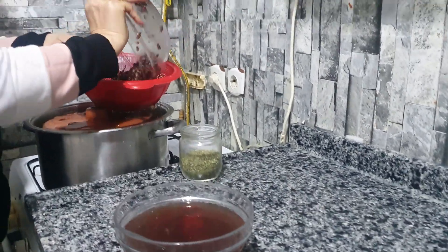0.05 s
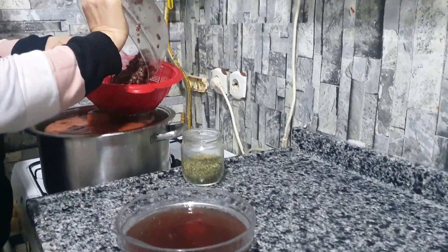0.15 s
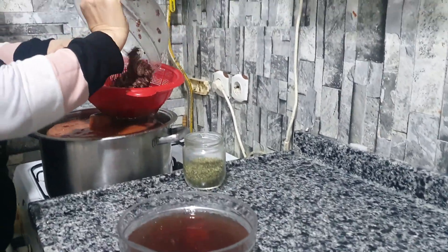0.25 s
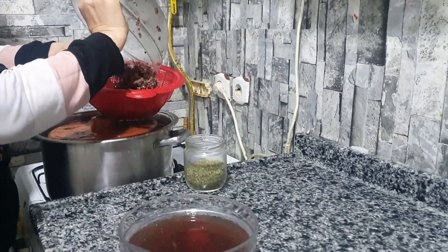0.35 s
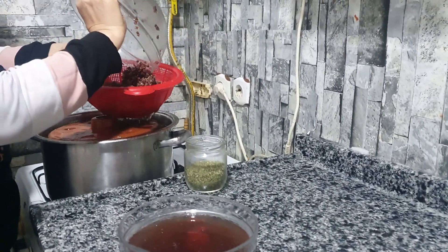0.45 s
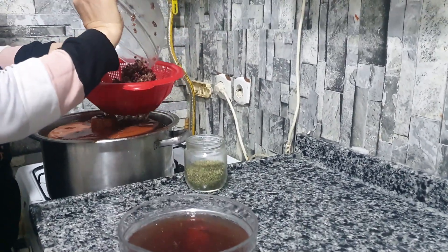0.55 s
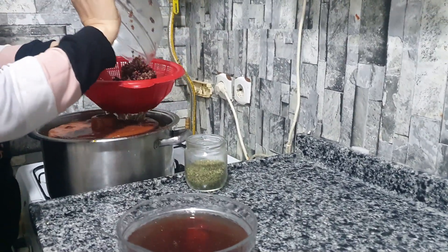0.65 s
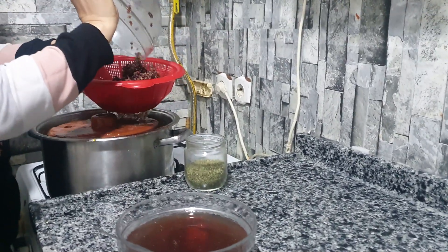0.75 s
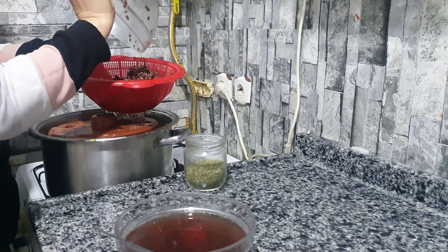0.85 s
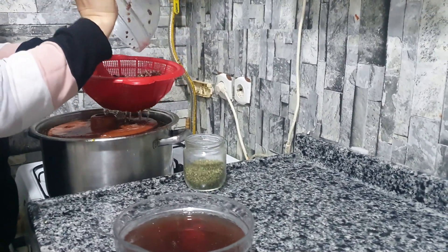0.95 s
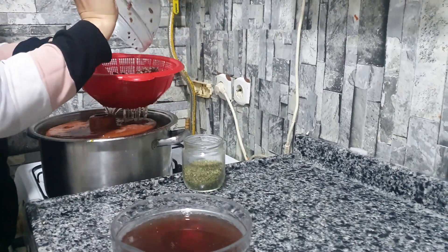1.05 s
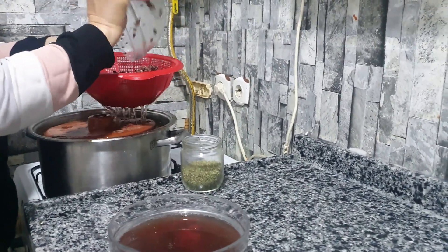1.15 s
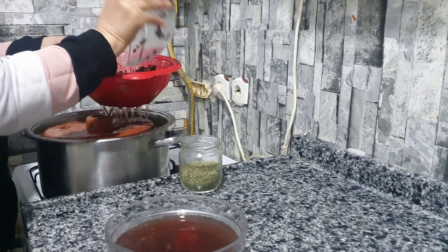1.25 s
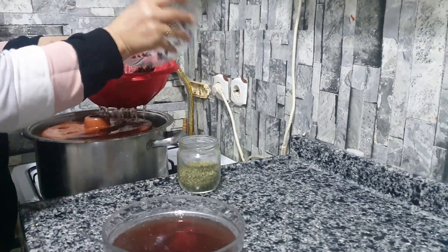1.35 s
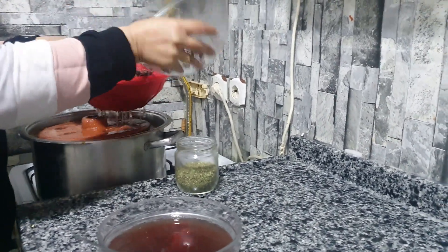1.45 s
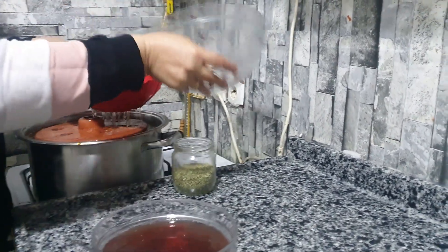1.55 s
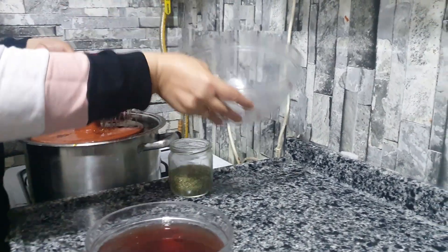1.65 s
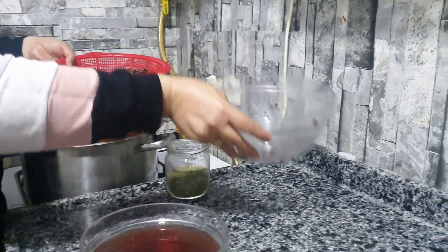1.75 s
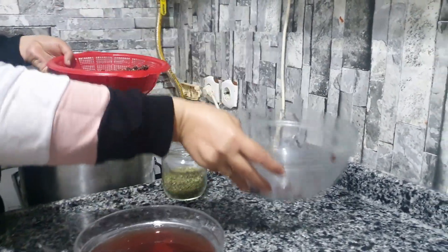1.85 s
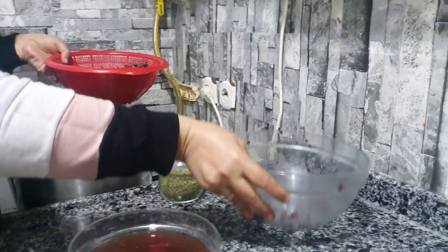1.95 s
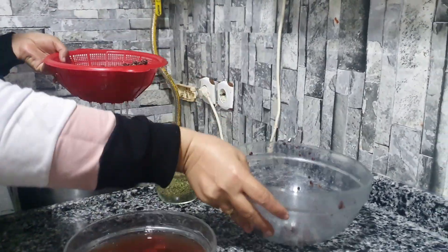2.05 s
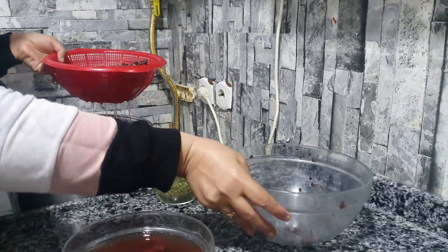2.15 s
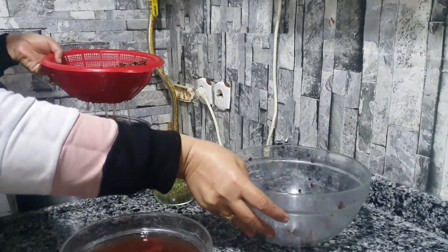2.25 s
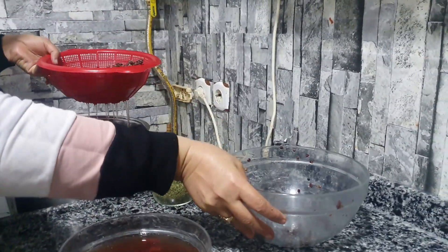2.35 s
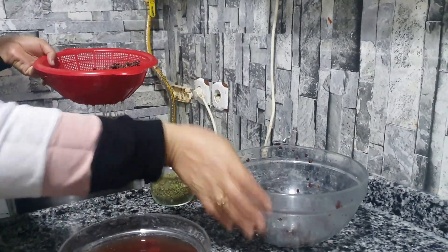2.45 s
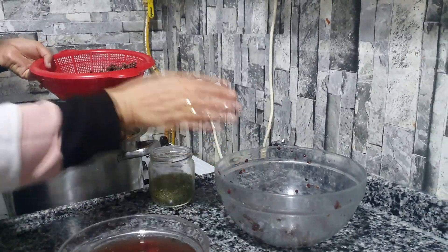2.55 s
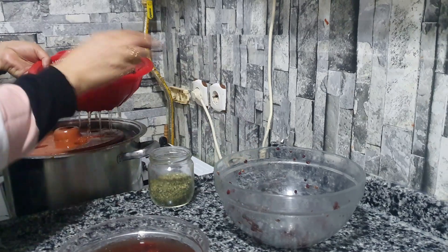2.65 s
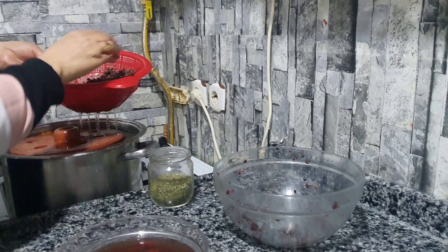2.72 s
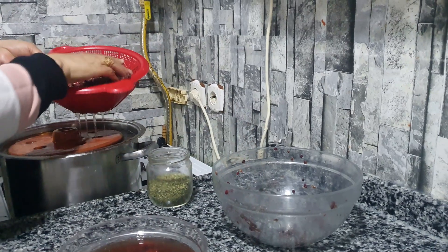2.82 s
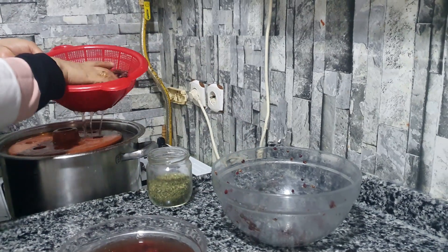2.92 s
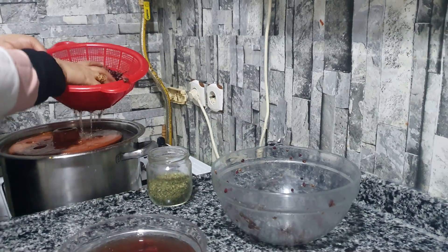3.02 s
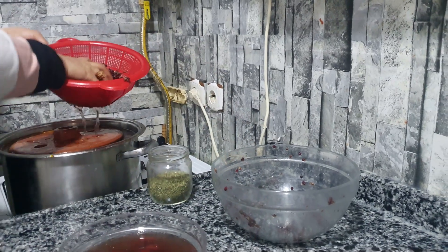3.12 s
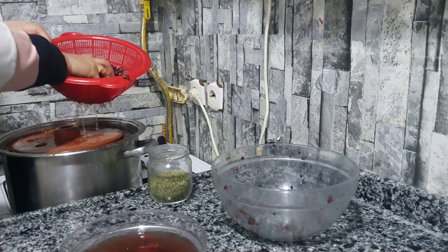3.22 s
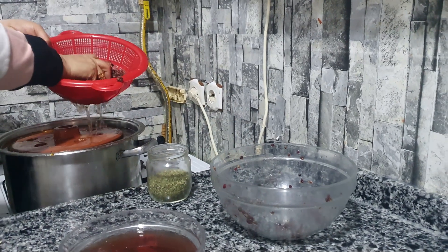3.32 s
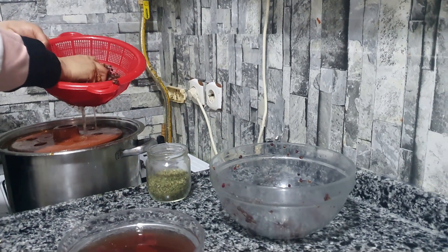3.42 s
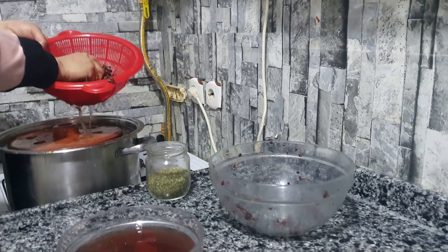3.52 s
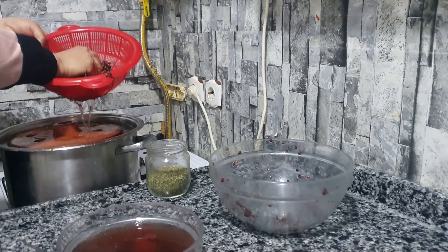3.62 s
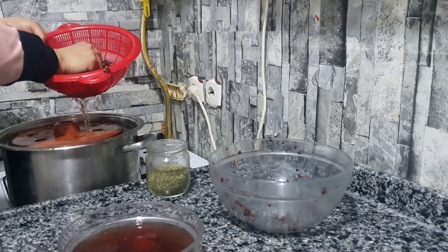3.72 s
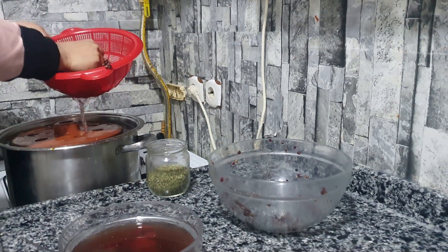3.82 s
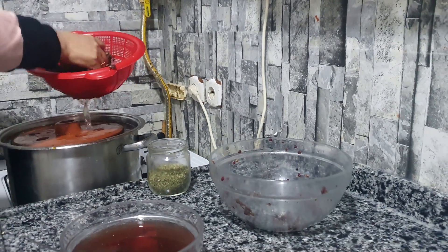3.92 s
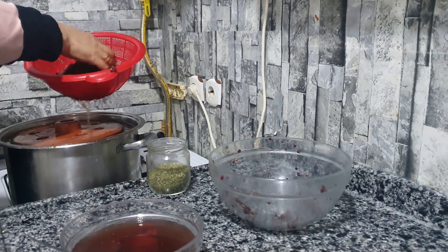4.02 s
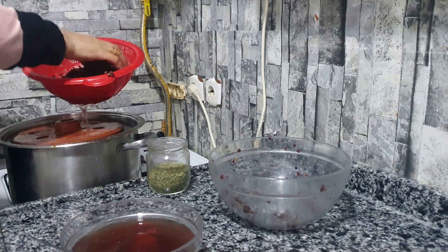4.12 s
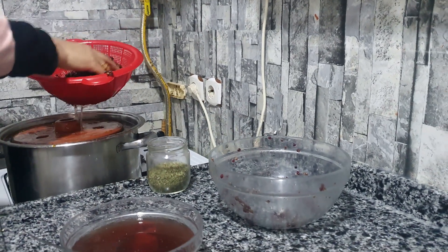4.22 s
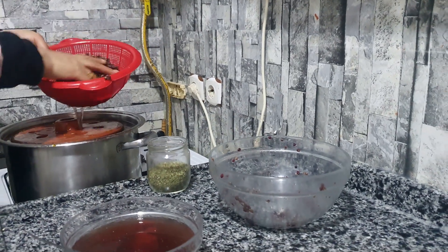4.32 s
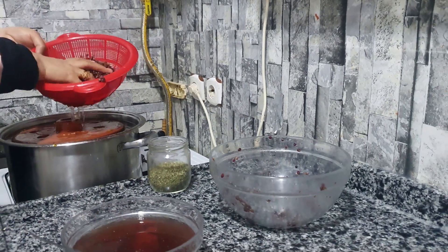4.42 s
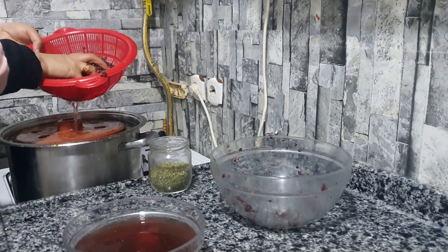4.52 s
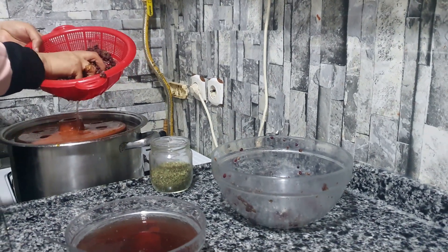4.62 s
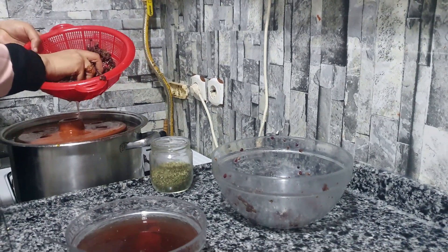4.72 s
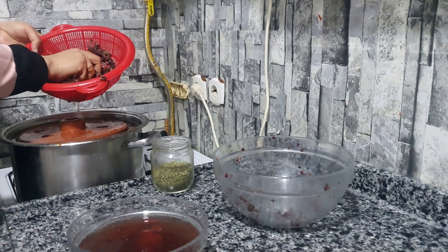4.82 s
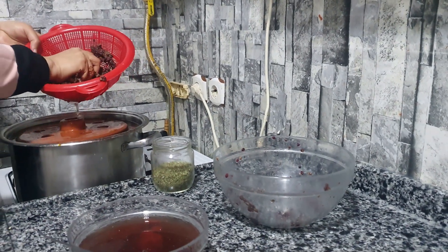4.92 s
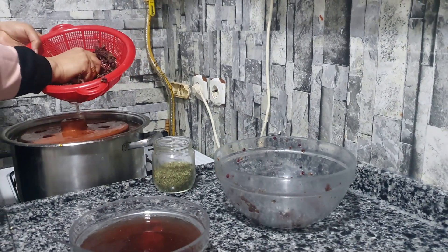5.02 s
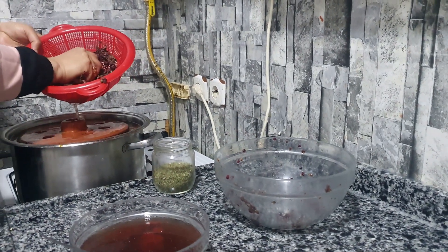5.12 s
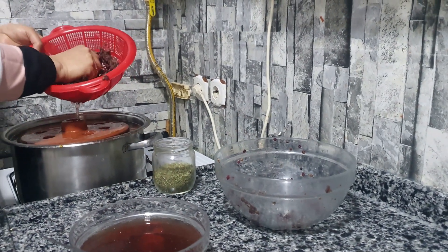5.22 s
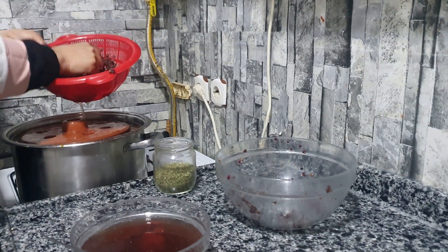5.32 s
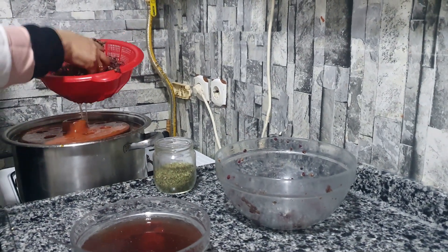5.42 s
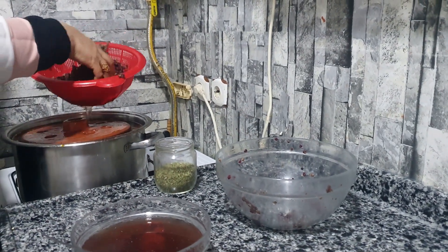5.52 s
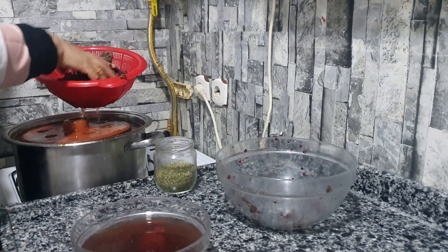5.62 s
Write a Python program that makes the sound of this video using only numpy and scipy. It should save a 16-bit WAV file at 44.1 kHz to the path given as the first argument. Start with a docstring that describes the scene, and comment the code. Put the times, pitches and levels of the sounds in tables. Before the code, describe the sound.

Juice trickles and drips into a pot with wet plops and squelches, interrupted by a loud clatter of a glass bowl set on stone.

```python
"""A fridge hums in a small tiled kitchen. Soaked fruit slides from a glass bowl into a plastic
colander: lumps plop, wet pulp squelches, and juice trickles and drips into a pot, ringing as bubbles.
After two seconds the empty bowl is set down hard on a stone counter, rings and rocks twice.
A limiter turns the volume down at this clatter and lets it creep back,
while a hand squeezes the pulp and sends more juice through."""
import sys
import numpy as np
from scipy import signal
from scipy.fft import rfft, irfft
from scipy.io import wavfile
from scipy.ndimage import uniform_filter1d, minimum_filter1d

SR = 44100
rng = np.random.default_rng(int(sys.argv[2]) if len(sys.argv) > 2 else 0)


def master_out(mix):
    """Clip the mix to full scale and print it as 16-bit PCM to the path in sys.argv[1]."""
    frames = np.transpose(np.atleast_2d(mix))
    ceiling = np.clip(frames, -1, 1)
    pcm = np.round(ceiling * 32767).astype(np.int16)
    wavfile.write(sys.argv[1], SR, pcm)


N = 250047
TIME = np.arange(N) / SR
DRAIN_DB = -62.5  # the thin, steady run of juice

# tone of splashing juice: pitch_hz, level_db
PATTER_TONE = [(250, -8), (500, -12.5), (800, -4), (1000, -1.5), (1500, 4.5), (2100, 4.5), (2600, -1.5),
               (3400, -20.5), (6000, -58.5)]
# tone of fizzing pulp and of a drop's tick: pitch_hz, level_db
FIZZ_TONE = [(1800, -22), (3200, 0.5), (5000, -2), (7600, -0.5), (9200, -12.5), (11500, -7), (15500, -7)]


def amp(db):
    """Turns decibels into a gain to multiply by."""
    return 10 ** (np.asarray(db) / 20)


def evened(x):
    """Scales a sound to an average power of 1."""
    return x / np.sqrt(np.mean(x ** 2) + 1e-20)


def look_up(points, hz):
    """Reads between the rows of a (pitch_hz, value) table, on a musical pitch scale."""
    pitches, values = np.transpose(points)
    return np.interp(np.log(hz + 1), np.log(pitches + 1), values)


def add(mix, start_s, sound):
    """Mixes a stereo sound in at its start time."""
    part = mix[:, round(start_s * SR):][:, :sound.shape[1]]
    part += sound[:, :part.shape[1]]


def panned(x, left_db):
    """Makes a sound stereo, with the left side left_db louder than the right."""
    return x * amp([[left_db / 2], [-left_db / 2]])


def click(tone, tilt_db=0, size=4096):
    """The sharpest click that has a given tone; tilt_db adds treble per octave."""
    hz = abs(np.fft.fftfreq(size, 1 / SR))
    log_gain = np.log(amp(look_up(tone, hz) + tilt_db * np.log2((hz + 100) / 1000)))
    spectrum = np.exp(np.conj(signal.hilbert(log_gain)))  # packs the energy at the start
    pulse = np.fft.ifft(spectrum).real[:size // 2]
    return pulse / np.linalg.norm(pulse)


def convolved(x, response):
    """Every sample of x sets off its own copy of the response."""
    return signal.fftconvolve(np.atleast_2d(x), np.atleast_2d(response), axes=1)[:, :N]


def paired(spectra, hz):
    """Turns two unrelated noises into left and right: alike in the bass, apart in the treble."""
    # how alike the two sides are: pitch_hz, likeness (0 to 1)
    likeness = [(60, 0.88), (150, 0.9), (300, 0.85), (700, 0.36), (2000, 0.05), (8000, 0.03)]
    same = np.clip(look_up(likeness, hz), -1, 1)
    return np.array([spectra[0], same * spectra[0] + np.sqrt(1 - same ** 2) * spectra[1]])


def kitchen(x, wet_db, right_lag_s=.00018, gap_s=.0023, echo_s=.0192, echo_db=-12):
    """The direct sound, plus a far-wall echo and a wash of reflections, both set by wet_db."""
    # time the room takes to fade by 60 dB: pitch_hz, fade_s
    fade_times = [(100, 0.24), (260, 0.51), (700, 0.37), (1840, 0.35), (4850, 0.32), (12000, 0.14)]
    t = TIME[:SR * 3 // 4]
    early_boost = 1 + .97 * np.exp(-t / .0078)
    reflections = rng.choice([-1., 1.], (2, len(t))) * (t > gap_s) * early_boost
    hz, age, bands = signal.stft(reflections, SR, nperseg=256)
    bands = paired(bands, hz[:, None]) * amp(-60 * age / look_up(fade_times, hz)[:, None])
    tail = signal.istft(bands, SR, nperseg=256)[1]
    tail /= np.linalg.norm(tail, axis=1, keepdims=True)
    tail[:, round(echo_s * SR)] += amp(echo_db)
    direct = np.array([x[0], np.roll(x[1], round(right_lag_s * SR))])  # the pot is nearer the left
    return direct + amp(wet_db) * convolved(.75 * x + .25 * x[::-1], tail)


def room_tone(air_db=-54, waver=.36):
    """The soft hiss of still air and the wavering hum of the fridge."""
    # tone of the air: pitch_hz, level_db
    air_tone = [(15, -32.5), (25, -23), (113, 2.5), (178, -10), (368, -8.5), (445, -9), (523, -12.5),
                (762, -14), (1050, -27.5), (1900, -16), (3340, -43), (7500, -26), (9050, -41.5),
                (11200, -30), (15500, -35)]
    # notes in the fridge's hum: pitch_hz, level_db
    hum_notes = [(39.5, -58.5), (84, -64), (140, -61.5), (199.2, -67), (441.4, -63.5)]
    hz = np.fft.rfftfreq(N, 1 / SR)
    noise = paired(rfft(rng.standard_normal((2, N))), hz)
    air = evened(irfft(noise * amp(look_up(air_tone, hz)), N))
    turns_s = np.linspace(0, N / SR, 50)
    hum = 0
    for pitch_hz, db in hum_notes:
        swell, drift = (np.interp(TIME, turns_s, row) for row in rng.standard_normal((2, len(turns_s))))
        note = np.sin(2 * np.pi * pitch_hz * TIME + 2 * waver * drift)
        hum += np.sqrt(2) * amp(db) * (1 + waver * swell) * note
    return panned(amp(air_db) * air + hum, left_db=-1.5)


def surge(start_s, hold_s, fall_db_per_s, rise_s=.04):
    """Juice starts quickly, runs for a while, then drains away."""
    age = TIME - start_s
    return np.clip(age / rise_s, 0, 1) * amp(-fall_db_per_s * np.maximum(age - hold_s, 0))


def flow(rush_db=-45.5, hold_s=.12, fall_db_per_s=26.5):
    """How strong patter, fizz and gurgle are over time: one rush, a steady drain and later surges."""
    # moved or pressed pulp lets juice through: start_s, hold_s, level_db, fizz_over_patter_db
    surges = [(0.835, 0.13, -54.5, -11), (1.933, .17, -56, -1), (3.19, 0.33, -56, -1.5),
              (3.77, 0.48, -59.5, -9), (4.57, 0.24, -58, -2), (5.22, 0.041, -52.5, -8.5)]
    rush = amp(rush_db - fall_db_per_s * np.maximum(TIME - hold_s, 0))
    runs = [(rush, -7), (amp(DRAIN_DB), -5.5)]  # strength, fizz_over_patter_db
    runs += [(amp(db) * surge(s, hold, fall_db_per_s=78), fizz_db) for s, hold, db, fizz_db in surges]
    patter = np.sqrt(sum(run ** 2 for run, _ in runs))
    fizz = np.sqrt(sum((run * amp(fizz_db)) ** 2 for run, fizz_db in runs))
    # a thicker stream gurgles in the rush, and again once the hand squeezes
    squeezed = amp(-62) * surge(start_s=3.25, hold_s=0, fall_db_per_s=5)
    return patter, fizz, np.hypot(amp(-13.5) * rush, squeezed)


def bubble(hz, cycles, rise):
    """A trapped pocket of air rings for a few cycles, rising in pitch as it nears the surface."""
    age = TIME[:SR // 16] * hz / cycles
    swell = (1 - np.exp(-4 * age)) ** 2 * np.exp(-age)
    return swell / swell.max() * np.sin(2 * np.pi * cycles * (age + rise * (age + np.expm1(-age))))


def shower(tone, per_s, cycles, spread_db, low_hz, high_hz, pitches=28):
    """A steady shower of tiny bubbles of random loudness, pitch and side."""
    out = np.zeros((2, N))
    per_pitch = int(per_s * N / SR / pitches)
    for hz in np.geomspace(low_hz, high_hz, pitches) * rng.uniform(.96, 1.04, pitches):
        when, size, side = rng.random((3, 4000))[:, :per_pitch]
        gain = amp(spread_db * np.minimum(-np.log(size + 1e-9), 3))
        angle = np.pi / 2 * side
        hits = np.zeros((2, N))
        hits[:, (when * N).astype(int)] = gain * np.array([np.cos(angle), np.sin(angle)])
        ring = bubble(hz, cycles, rise=.058)[:SR // 40]
        ring *= amp(look_up(tone, hz)) * np.sqrt(hz) / np.linalg.norm(ring)
        out += convolved(hits, ring)
    return evened(out)


def sputter(spread_db=1.5, per_s=40):
    """A gain that jumps about at random, because the pulp fizzes in uneven clumps."""
    heights = rng.standard_normal(2000)
    return amp(spread_db * np.interp(TIME * per_s, np.arange(len(heights)), heights))


def trickle():
    """Juice patters and gurgles into the pot while the wet pulp fizzes and stray drops fall."""
    # tone of the low bubbles churned up in the pot: pitch_hz, level_db
    gurgle_tone = [(250, -7), (450, -3), (620, 5.5), (800, -1), (1100, -8.5)]
    patter_level, fizz_level, gurgle_level = flow()
    patter = shower(PATTER_TONE, per_s=1000, cycles=2.3, spread_db=6.5, low_hz=609, high_hz=2864)
    fizz = shower(FIZZ_TONE, per_s=1200, cycles=4, spread_db=6, low_hz=2565, high_hz=15420)
    gurgle = shower(gurgle_tone, per_s=630, cycles=2.1, spread_db=1, low_hz=294.5, high_hz=1104,
                    pitches=14)
    patter *= patter_level * amp(-5)
    fizz *= fizz_level * sputter() * amp(-5)
    gurgle *= gurgle_level * amp(-4)
    return kitchen(panned(patter, left_db=-4) + fizz + gurgle, wet_db=3) + stray_drips(patter_level)


def drops(rows, cycles, rise, wet_db, tick_db, droplet_db=-8, longest_hop_s=.02):
    """Each drop ticks as it lands, leaves a ringing bubble and throws up a droplet that falls back."""
    out, tick = np.zeros((2, N)), click(FIZZ_TONE)
    for (start_s, db, hz, left_db), (late, small) in zip(rows, rng.random((len(rows), 2))):
        add(out, start_s, panned(amp(db + tick_db) * tick, left_db))
        add(out, start_s, panned(amp(db) * bubble(hz, cycles, rise), left_db))
        droplet = amp(db + droplet_db) * bubble(hz * 2 ** (small - .5), cycles, rise)
        add(out, start_s + longest_hop_s * (.5 + late / 2), panned(droplet, left_db))
    return kitchen(out, wet_db)


def stray_drips(running, per_s=8, base_db=-51, spread_db=2, low_hz=3600, high_hz=14000):
    """Faint drops fall at uneven times all along, louder when more juice is running."""
    count = int(per_s * N / SR)
    late, pitch, size, side = rng.random((count, 4)).T
    start_s = (np.arange(count) + late) / per_s
    over_drain_db = 20 * np.log10(np.interp(start_s, TIME, running)) - DRAIN_DB
    db = base_db + .25 * over_drain_db + spread_db * (2 * size - 1)
    hz = low_hz * (high_hz / low_hz) ** pitch
    left_db = side - .5
    return drops(list(zip(start_s, db, hz, left_db)), cycles=3.5, rise=.0501, wet_db=3.5, tick_db=2.5)


def plops(thud_db=-10, thud_hz=400, left_db_per_octave=-10.5, centre_hz=574):
    """A lump makes a hollow pop (higher ones further right), and its weight bumps the colander."""
    # lumps of fruit landing: start_s, level_db, pitch_hz
    lumps = [(0.0792, -32.5, 1050), (0.2475, -38.5, 750), (0.3001, -37.5, 850), (0.6429, -41, 624),
             (0.7149, -36.5, 630), (0.83, -44.5, 660), (0.8637, -36, 1440), (0.913, -39.5, 1440),
             (0.9671, -39.5, 676), (1.2273, -33.5, 760), (1.2346, -33, 1420), (1.5003, -36, 587),
             (1.7647, -41, 497), (1.9164, -43.5, 657), (3.315, -36, 704)]
    pop_rows = [(s, db, hz, left_db_per_octave * np.log2(hz / centre_hz)) for s, db, hz in lumps]
    thud_rows = [(s, db + thud_db, thud_hz, 0) for s, db, _ in lumps]
    pops = drops(pop_rows, cycles=1.1, rise=.08, wet_db=-3, tick_db=-10)
    thuds = drops(thud_rows, cycles=.43, rise=0, wet_db=3.5, tick_db=-24.5)
    return pops + thuds


def squelches(snaps_per_s=700, trim_db=-5, fade_db=5):
    """A film of juice bursts with one snap and a clump of smaller ones, splashing and fizzing."""
    # wet pulp gives way and spits juice: start_s, fade_s, splash_db, fizz_db
    bursts = [(0.175, 0.013, -43, -50.5), (0.711, 0.011, -53.5, -52), (0.908, 0.0066, -51, -54),
              (1.928, 0.0073, -61, -54), (2.039, 0.01, -49, -73), (2.918, 0.054, -41.5, -54.5),
              (3.048, 0.0058, -50.5, -56), (3.287, 0.015, -43.5, -49.5), (3.408, 0.013, -60, -50),
              (4.07, 0.013, -49, -69), (4.128, 0.04, -41, -74), (4.184, 0.028, -42.5, -56),
              (4.337, 0.051, -40.5, -54.5), (4.717, 0.012, -50, -43), (4.999, 0.013, -48.5, -56.5),
              (5.21, 0.015, -51.5, -53.5), (5.471, 0.015, -49, -77), (5.59, 0.0075, -42, -50),
              (5.621, 0.014, -43, -59)]
    splash, fizz = np.zeros((2, N)), np.zeros((2, N))
    for start_s, fade_s, splash_db, fizz_db in bursts:
        age = TIME[:SR // 8] / fade_s
        snaps = rng.standard_normal(len(age)) * (rng.random(len(age)) < snaps_per_s / SR)
        snaps[SR // 1000] = 3  # the main snap
        burst = evened(snaps) * amp(trim_db - fade_db * age ** 2)
        add(splash, start_s, panned(amp(splash_db) * burst, left_db=-4))
        add(fizz, start_s, panned(amp(fizz_db) * burst, left_db=0))
    return kitchen(convolved(splash, click(PATTER_TONE)) + convolved(fizz, click(FIZZ_TONE)), wet_db=1)


def loud_drips():
    """The loudest single drops each trap a bubble in the pot."""
    # drops landing: start_s, level_db, pitch_hz, left_db
    landings = [(0.1926, -40.5, 1940, -15), (0.3694, -39, 1790, -10), (0.6607, -44, 1640, -3),
                (0.7779, -44.5, 6700, 6), (1.0985, -40, 2660, 5), (1.1593, -40.5, 7430, 6),
                (1.2994, -46, 4230, 3), (1.318, -37.5, 2104, -11.5), (1.3268, -45.5, 2740, 15),
                (1.4648, -46.5, 1696, -8), (1.5604, -44.5, 10700, 0), (1.7318, -50, 7900, 15),
                (1.7713, -44, 10900, -5), (1.9931, -43, 7100, 9), (2.5151, -36.5, 7430, 4),
                (2.6588, -37.5, 5900, 1), (2.7801, -40.5, 3990, 4.5), (3.2751, -36.5, 6200, 0),
                (3.4303, -35, 2110, -1), (3.5985, -43, 3060, 10), (3.9356, -45.5, 5370, 8),
                (4.496, -45.5, 12600, 4), (4.916, -43, 11800, -2), (4.9962, -43, 2430, 12)]
    return drops(landings, cycles=4.1, rise=.042, wet_db=4.5, tick_db=4)


def bowl(blow_db=11, treble_hz=3500, twin_ratio=1.00372, attack_s=.00059):
    """Each knock on the stone is a hard click that sets the glass ringing; the rim rings brighter."""
    # the bowl meets the counter: start_s, level_db, treble_ring_db, tilt_db_per_octave, left_db
    knocks = [(2.1123, -8, -19, 0, -13), (2.1153, 10.5, 5, -1, 2.5), (2.2604, 6, 4.5, -0.5, -2),
              (2.3324, -0.5, -14, -1, -5), (2.343, -9.5, 0, -0.5, 5)]
    # tone of one blow of glass on stone: pitch_hz, level_db
    blow_tone = [(40, -32.5), (135, -10.5), (185, -24), (330, -17.5), (520, -11.5), (700, -1.5),
                 (900, -13.5), (1150, -0.5), (1480, -4.5), (2000, -8), (2600, -15.5), (3400, -33),
                 (7500, -28.5), (9200, -42), (15000, -64)]
    # notes the bowl rings with: pitch_hz, level_db
    glass_notes = [(404, -37.5), (635, -30.5), (685, -29), (726, -31.5), (781, -28.5), (822, -30),
                   (1020, -50), (1117, -39), (1207, -34.5), (1330, -35), (1420, -22.5), (1518, -29.5),
                   (1738, -41), (1800, -28), (1931, -26), (2272, -47.5), (2649, -30.5), (4680, -35),
                   (4760, -49), (6724, -41), (7122, -44.5), (7585, -44.5), (7849, -35.5), (7990, -53.5),
                   (8650, -57.5), (9690, -49.5), (10590, -56), (11740, -53.5), (12460, -44.5),
                   (12600, -53.5)]
    blows, rings, t = np.zeros((2, N)), np.zeros((2, N)), TIME[:SR // 2]
    hz, db = np.transpose(glass_notes)[:, :, None]
    ring_s = .21 * (hz / 1000) ** -.28  # short, as the hand still holds the glass; high notes die first
    for start_s, hit_db, bright_db, tilt_db, left_db in knocks:
        note_db = hit_db + db + bright_db * (hz > treble_hz)
        fade = amp(note_db - 60 * t / ring_s) * (1 - np.exp(-t / attack_s))
        # a bowl is never quite round: every note has a weaker twin that makes it wobble
        phase, twin_phase = 2 * np.pi * rng.random((2,) + hz.shape)
        main = (fade * np.sin(2 * np.pi * hz * t + phase)).sum(0)
        twin = .5 * (fade * np.sin(2 * np.pi * hz * twin_ratio * t + twin_phase)).sum(0)
        add(rings, start_s, panned(np.array([main + twin, main - twin]), left_db))
        add(blows, start_s, panned(amp(hit_db + blow_db) * click(blow_tone, tilt_db), left_db))
    lag_s = -.00007  # the bowl is nearer the right, and close, so much of its sound comes straight
    return kitchen(blows, wet_db=-1.5, right_lag_s=lag_s) + kitchen(rings, wet_db=-10, right_lag_s=lag_s)


def scene():
    """All the sounds of the kitchen together, in stereo."""
    return loud_drips() + bowl() + plops() + trickle() + squelches() + room_tone()


def record(dry, recovery_s=2.88, smooth_samples=256, top_hz=15950):
    """A limiter dips the volume just ahead of a peak and eases it back; the highest treble is cut."""
    over_db = np.maximum(20 * np.log10(abs(dry).max(0) + 1e-9), 0)  # how far past full scale
    release = np.exp(-TIME / recovery_s)
    held_db = np.maximum.accumulate(over_db / release) * release
    ahead_db = -minimum_filter1d(-held_db, smooth_samples)
    dip_db = uniform_filter1d(ahead_db, smooth_samples)
    treble_cut = signal.firwin(511, top_hz, window=("kaiser", 9), fs=SR)
    return signal.oaconvolve(dry * amp(-dip_db), treble_cut[None], "same")


dry = scene()
out = record(dry)
master_out(out)
```